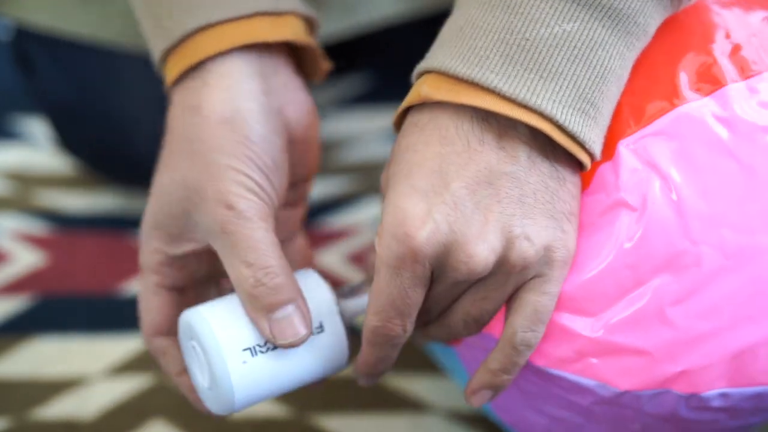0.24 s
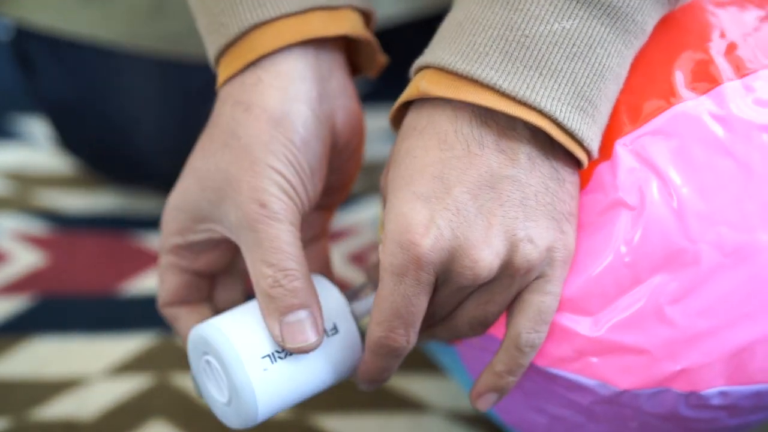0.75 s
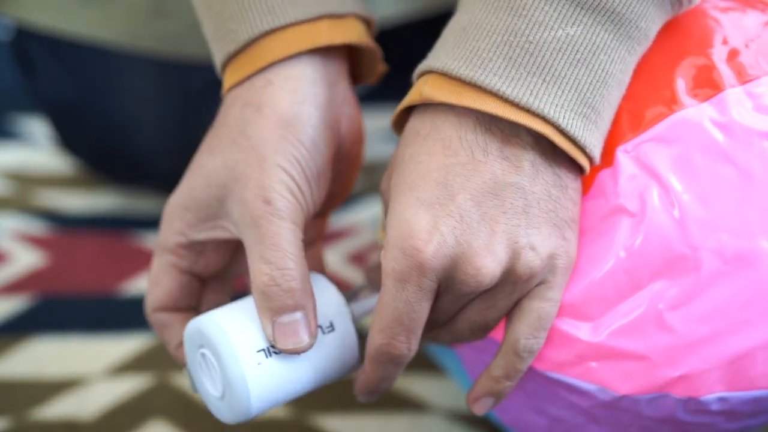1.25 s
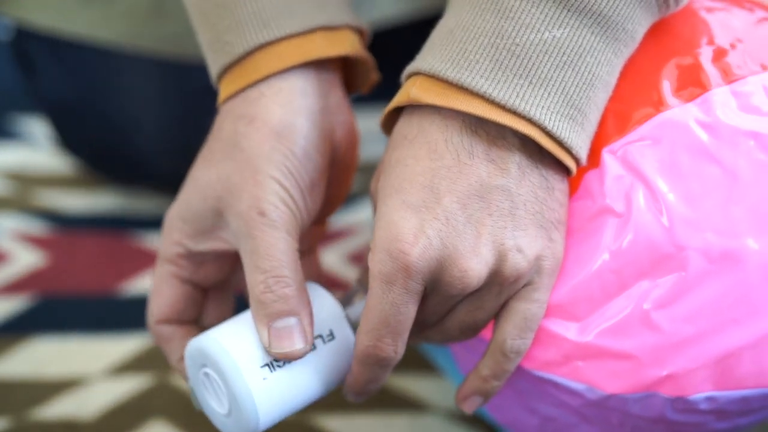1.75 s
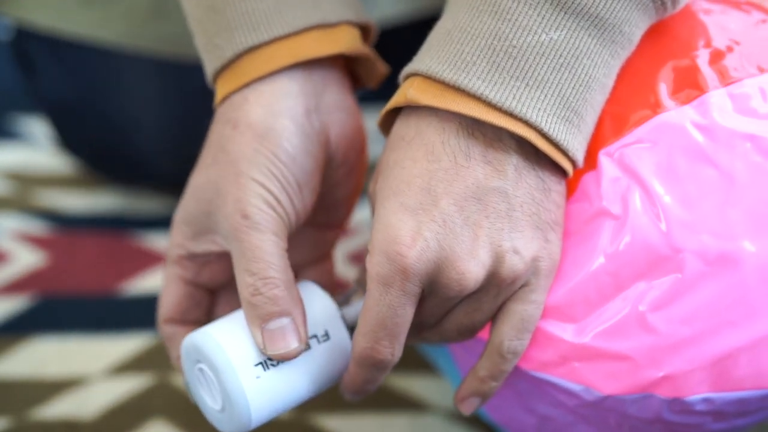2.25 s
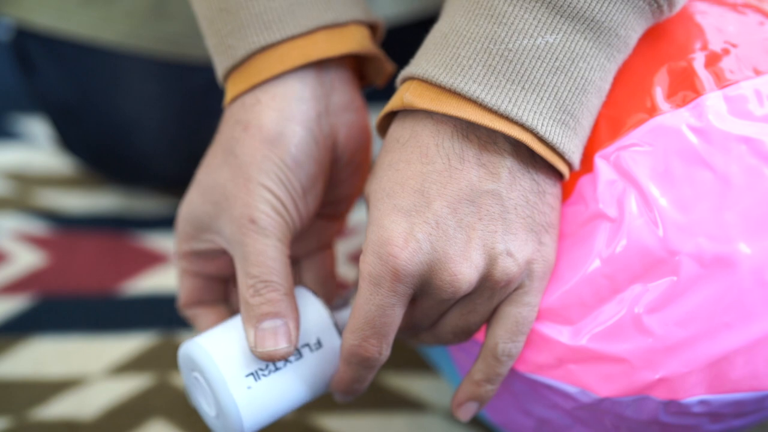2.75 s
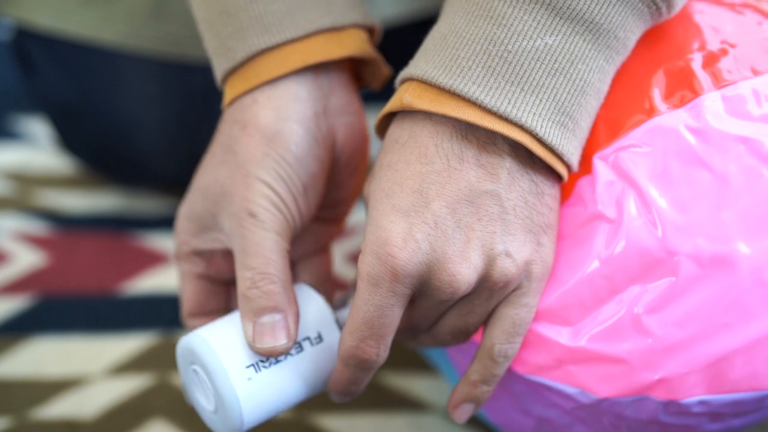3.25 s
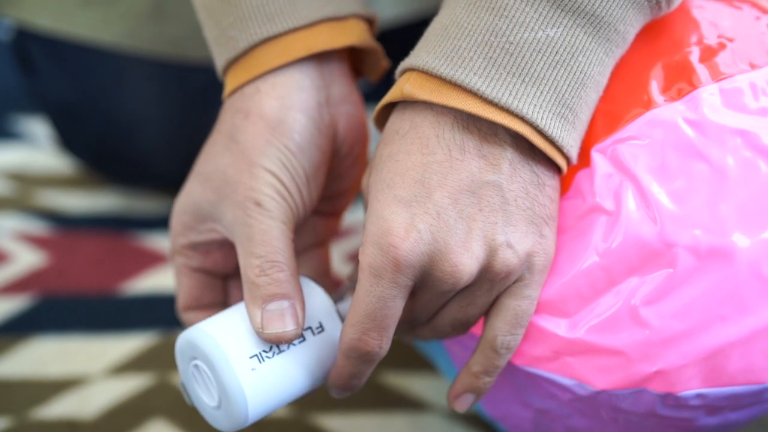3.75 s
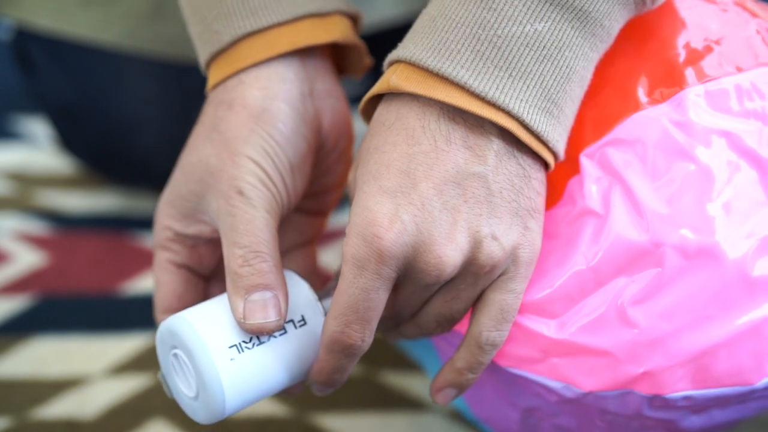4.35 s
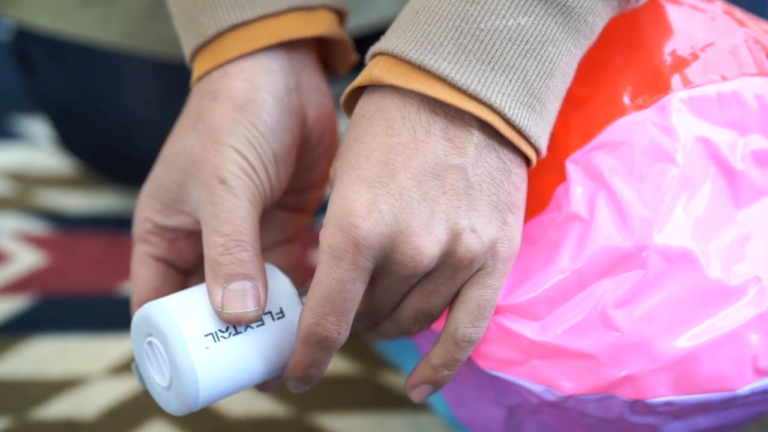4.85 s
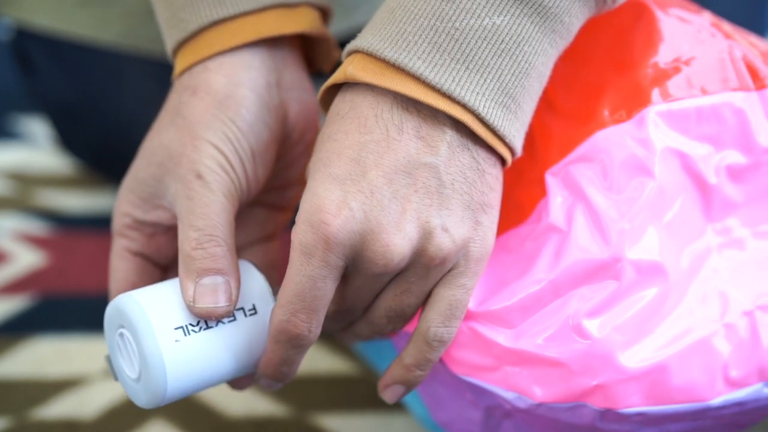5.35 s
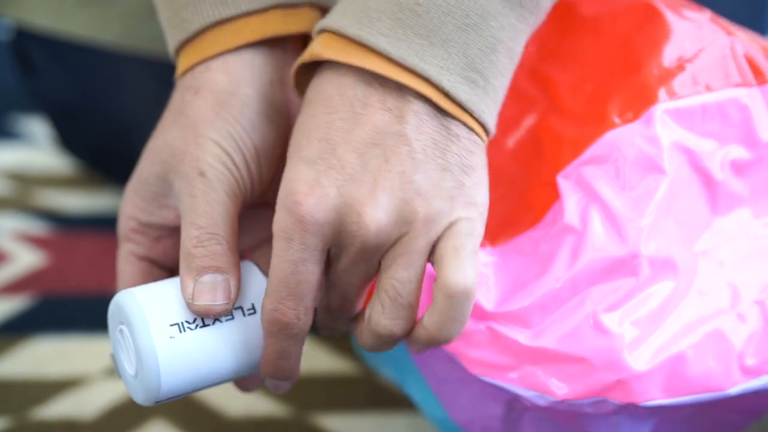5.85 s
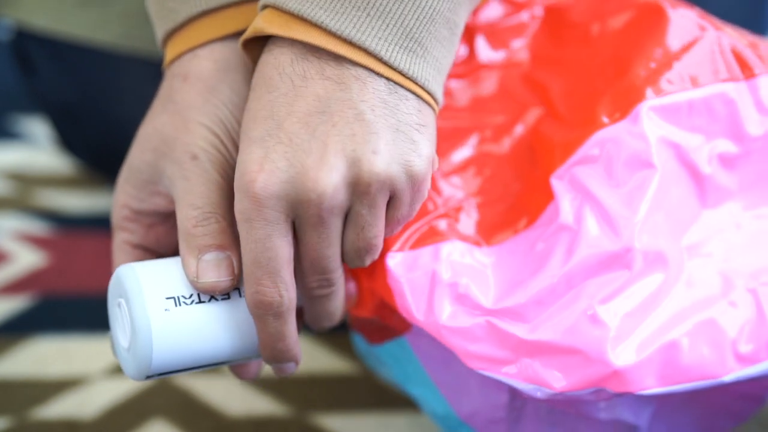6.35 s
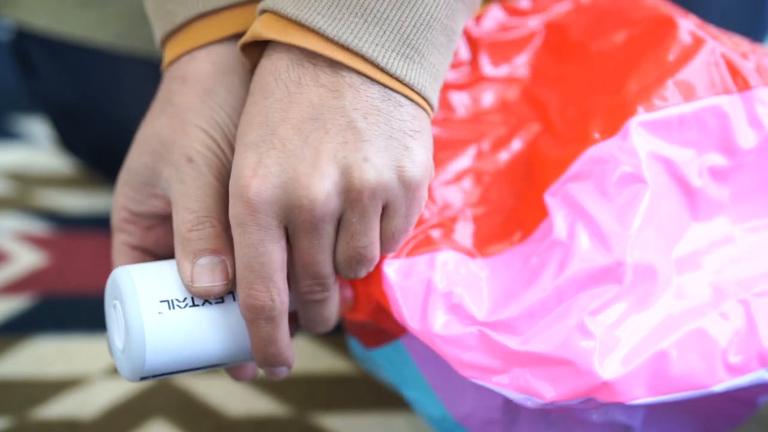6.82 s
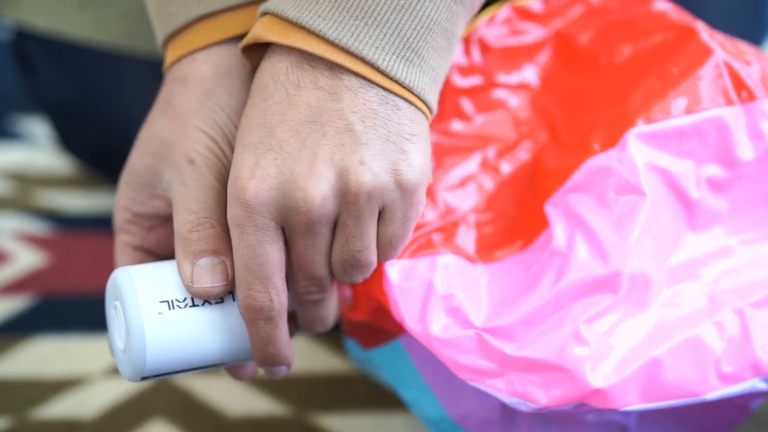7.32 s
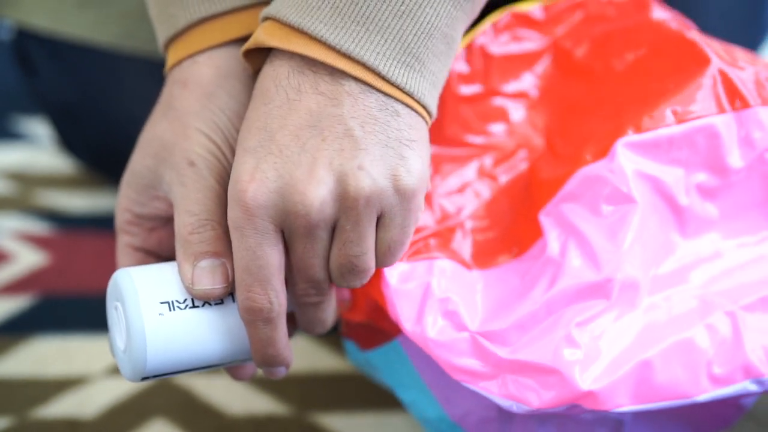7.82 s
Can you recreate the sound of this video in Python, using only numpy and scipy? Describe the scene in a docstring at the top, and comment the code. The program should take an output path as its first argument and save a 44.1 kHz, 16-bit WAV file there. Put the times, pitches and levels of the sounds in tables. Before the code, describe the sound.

In a small, quiet room, fingers fit a handheld battery air pump to a vinyl inflatable, making faint ticks, crinkles and soft bumps. A few plastic button clicks follow. Nearly halfway through, the motor spins up with a quickly rising whine, then runs steadily with a hiss of rushing air. The high tone swells and fades between left and right on the close stereo microphone as the hands shift.

```python
"""A small, quiet room, with a stereo microphone close to a hand-held battery air pump.
Fingers fit the pump to a vinyl inflatable, with ticks and low bumps, and press its button.
A nine-blade impeller spins up to a whine, and air rushes through the resonant housing and nozzle.
The hands shift, so each side of the microphone hears the tones swell and fade on its own."""
import sys
import numpy as np
from scipy import signal
from scipy.fft import rfft, irfft
from scipy.io import wavfile
from scipy.ndimage import uniform_filter1d, map_coordinates

SR = 44100
rng = np.random.default_rng(int(sys.argv[2]) if len(sys.argv) > 2 else 0)


def wav_out(sig):
    """Save sig, one row per channel (or a flat mono array), as 16-bit PCM at SR to the path in sys.argv[1]."""
    wavfile.write(sys.argv[1], SR, np.round(np.clip(np.atleast_2d(sig).T, -1, 1) * 32767).astype(np.int16))


N = 356328

# The empty room. Each row: frequency in Hz, relative noise density in dB.
ROOM_SPECTRUM = [(12, -5), (20, 5.5), (74, -4.5), (204, -8), (780, -17), (1400, -18.5), (14000, -35.5)]
# Its stereo image. Each row: frequency in Hz, left-right likeness from 0 to 1, left over right in dB.
ROOM_IMAGE = [(30, 0.016, 9.5), (135, 0.61, 0.5), (1800, 0.53, 2.5), (7000, 0.058, 1)]
# The background sinks once the pump is loud. Each row: time in seconds, level in dB.
ROOM_LEVEL = [(0, -37.5), (.6, -39), (3.7, -38.5), (4.1, -41.5), (5.1, -46.5)]
# Ticks of vinyl and nozzle. Each row: start in seconds, level in dB, band's nominal Hz, t60 in seconds.
VINYL_TICKS = [(0.146, -25, 1400, 0.02), (0.178, -22, 3770, 0.013), (.447, -18, 3230, 0.016),
               (0.586, -21, 2830, 0.015), (.753, -22.5, 5600, 0.077), (0.923, -20.5, 2540, 0.013),
               (1.728, -29.5, 5000, 0.055), (2.058, -20, 8000, 0.0027), (2.437, -23, 2980, 0.01),
               (2.522, -25, 1280, 0.019), (3.119, -25, 7500, 0.038), (3.324, -20.5, 6500, 0.035),
               (3.64, -27, 4000, 0.042)]
# Handling bumps. Each row: start in seconds, level in dB, pitch in Hz.
HAND_BUMPS = [(.146, -26, 350), (.215, -27, 484), (3.497, -23, 30), (3.547, -22, 192)]
# Taps on the plastic shell. Each row: start in seconds, strength in dB, treble gain in dB.
BUTTON_TAPS = [(3.155, -28.5, 8), (3.351, -19, -7), (3.4288, -27, 8), (3.6563, -18, -5.5)]
# The shell's modes. Each row: frequency in Hz, relative level in dB, t60 in seconds.
SHELL_MODES = [(1410, -3, 0.01), (3000, 2, .005), (4600, 1, .005), (6920, 3, 0.014), (7500, 2, 0.014)]
# The speed the loaded motor settles to. Each row: time in seconds, shaft rate in Hz.
SETTLED_SPEED = [(4.0, 636), (4.2, 626.5), (4.47, 632), (4.75, 632.6), (4.89, 638.6), (5.4, 629.8),
                 (6.15, 633.8), (6.45, 639), (6.85, 642.5), (7.1, 640.3), (7.22, 642.2), (7.45, 639),
                 (8.08, 640.5)]
# The hands change grip. Each row: time in seconds, share of the second grip from 0 to 1.
GRIP_SHIFT = [(4.9, 0.11), (6.2, 0.45), (7.3, 1.0)]
# The blade tone at the microphone as the hands move.
# Each row: time in seconds, left and right level in dB before colouring, left phase lead in radians.
BLADE_AT_MIC = [(3.8, -17.5, -16, -1), (3.95, -19, -14.5, -2), (4.38, -25.5, -14.5, -1.5),
                (4.46, -12, -13, -0.9), (4.68, -13, -21, -1.5), (4.76, -12, -22, -3.5),
                (4.81, -26, -12, -7.5), (4.9, -12.5, -16, -9), (5.01, -23, -13, -7.5),
                (5.07, -26, -10, -10.4), (5.22, -16.5, -11, -9.5), (5.36, -16, -12.5, -9.5),
                (5.6, -19.5, -11.5, -9.5), (6.05, -22, -13.5, -9), (6.19, -17, -14, -9),
                (6.35, -18, -14.5, -11.5), (6.6, -25, -16, -12), (6.85, -20.5, -19.5, -14),
                (6.93, -18, -20, -15.5), (7.25, -11.5, -14, -15.5), (7.45, -17.5, -26, -15),
                (7.8, -15.5, -28, -15), (8.08, -19.5, -28, -13)]
# Its octave. Each row: time in seconds, left and right level in dB before colouring.
OCTAVE_AT_MIC = [(4.3, -38, -35.5), (4.65, -42, -34.5), (5.7, -40, -35.5), (6.25, -43, -33.5),
                 (6.6, -37, -41), (6.95, -48, -32), (7.3, -45, -39.5), (8.08, -47, -42)]
# How the housing colours a tone. Each row: frequency in Hz, gain in dB.
HOUSING_COLOUR = [(300, -3.5), (480, 9.5), (630, 0), (1500, -16), (2160, 7.5), (2750, -11), (3950, -4),
                  (4300, 9.5), (5650, -0.5), (6600, 22), (8000, 15), (9000, -1), (10300, 8), (10950, 19),
                  (11350, 2.5)]
# The shaft tone against the rush, left then right. Each row: dB in the first grip, dB in the second.
SHAFT_AT_MIC = [(-3.5, -16), (-3.5, -8.5)]
# Weak shaft harmonics. Each row: multiple of the shaft rate, left and right dB in the first grip,
# left and right dB in the second, left phase lead in radians.
SHAFT_HARMONICS = [(3, -45, -45, -51, -43, .4), (5, -50, -42, -60, -46, -2.0), (6, -50, -45, -44, -38, -.9),
                   (7, -52, -39, -43, -43, -2.6), (8, -54, -42, -34, -34, 2.2)]
# The rush of air at full speed. Each row: time in seconds, base level in dB.
RUSH_LEVEL = [(3.78, -29), (3.92, -35), (4.1, -35), (4.25, -32.5), (4.95, -32.5), (5.12, -35.5),
              (6.0, -35.5), (6.6, -33), (8.08, -33.5)]
# The nozzle's narrow hiss, shaded while the hands move.
# Each row: time in seconds, level against the rush in dB, left phase lead in radians.
NOZZLE_HISS = [(4.5, 0, -0.84), (5.2, -6, -1.7), (6.6, -10, -.7), (7.1, 0.5, -.4)]
# Housing resonances; pairs are first grip, then second. Each row: two centres in Hz, width in Hz,
# two levels against the rush in dB, two left-over-right balances in dB, two left leads in radians.
HOUSING_MODES = [(469.5, 430, 250, -12.5, -15, -5.5, -2.5, -1.2, -1.5),
                 (1095, 1130, 290, -11, -16.5, -5.5, -13.5, -2, -0.5),
                 (1401, 1310, 144, -5.5, -9.5, -5.5, -5, -2.16, -0.8),
                 (1990, 2010, 137, -3.5, -2.5, -6.5, -7.5, -3.5, 0.5),
                 (2230, 2150, 187, 3, 2.5, -9, -3.5, 1.17, -0.5),
                 (3320, 3300, 410, -8.5, -17.5, -4, -4, -0.6, 3.5),
                 (3894, 3850, 600, -2.5, -0.5, -9, -6, -1.7, -.5),
                 (4633, 4800, 1140, 4, -0.5, -4, -3.5, -2, -3.5), (6080, 5800, 560, 3.5, 3, 0, 4.5, -3, -3),
                 (6770, 6850, 380, 0.5, 0.5, -5, 0, -4, -4),
                 (8250, 8500, 1530, 1, 0.5, -1.5, 0.5, -3, -2.5),
                 (9800, 9800, 740, -3, -5.5, 1, 0, -4.5, -4.5),
                 (12100, 12900, 2400, -19, -17.5, 0, -2, 1.1, 0.8)]

BLADES, NOMINAL_SHAFT_HZ = 9, 630
START_S, SPIN_UP_S = 3.633, .248
NOZZLE_HZ, NOZZLE_WIDTH_HZ, NOZZLE_PAN_DB = 4090, 123, -1.5
UNSHARED_BY_GRIP = (0.57, .3)   # share of the rush at 6 kHz that the two sides do not have in common


def from_db(db):
    """Decibels to gain."""
    return 10 ** (np.asarray(db) / 20)


def unit_power(x):
    """Scale to an RMS of 1."""
    return x / np.sqrt(np.mean(np.abs(x) ** 2) + 1e-20)


def in_time(rows):
    """Columns of a table as curves, sample by sample."""
    seconds, *columns = np.transpose(rows)
    return [np.interp(np.arange(N) / SR, seconds, column) for column in columns]


def at_hz(rows, hz, column=1):
    """Read a column of a spectrum on a log frequency axis."""
    rows = np.array(rows)
    return np.interp(np.log(hz), np.log(rows[:, 0]), rows[:, column])


def blend(first, second, share):
    """Slide from the first value to the second."""
    return first + (second - first) * share


def drift(rate_hz):
    """Smooth random wander with a spread of 1."""
    step = 40   # samples
    pole = np.exp(-2 * np.pi * rate_hz * step / SR)
    slow = signal.lfilter([1], [1, -2 * pole, pole * pole], rng.standard_normal(N // step + 2002))[2000:]
    return np.interp(np.arange(N) / step, np.arange(len(slow)), unit_power(slow))


def phase_of(hz):
    """Running phase of a changing frequency."""
    return 2 * np.pi * np.cumsum(hz) / SR


def stereo_tone(phase, left_db, right_db, lead):
    """A tone at the microphone, its left side ahead by lead radians."""
    left = from_db(left_db) * np.cos(phase + lead)
    right = from_db(right_db) * np.cos(phase)
    return np.sqrt(2) * np.array([left, right])


def ring(clicks, hz, t60):
    """Each click sets a dying sine ringing."""
    r, w = from_db(-60 / (t60 * SR)), 2 * np.pi * hz / SR
    return signal.lfilter([0, np.sin(w)], [1, -2 * r * np.cos(w), r * r], clicks + 1e-18)


def room_tone(hum_db):
    """Bass-heavy room noise; a narrow peak at 120 Hz is the rough mains hum."""
    hz = np.maximum(np.fft.rfftfreq(N, 1 / SR), 1)
    mid, side = rfft(rng.standard_normal((2, N))) * from_db(at_hz(ROOM_SPECTRUM, hz))
    mid *= 1 + from_db(hum_db) / (1 + ((hz - 120) / 6) ** 2)
    alike = np.clip(at_hz(ROOM_IMAGE, hz), 0, 1)
    spectrum = np.sqrt(1 + alike) * mid + np.sqrt(1 - alike) * side * [[1], [-1]]
    balance = from_db(at_hz(ROOM_IMAGE, hz, column=2) / 2 * [[1], [-1]])
    return unit_power(irfft(balance * spectrum, N))


def vinyl_crackle(per_second):
    """Tiny crackles come in clusters, a little to the left, each ringing at one of eight pitches."""
    sizes = from_db(3.5 * np.minimum(rng.exponential(1, N), 2.2))
    clicks = sizes * (rng.random(N) < per_second * from_db(6 * drift(2.5)) / SR)
    mode = rng.integers(0, 8, N)
    pitches = np.geomspace(1100, 6000, num=8)
    crackle = sum(ring(clicks * (mode == k), hz, t60=5 / hz) for k, hz in enumerate(pitches))
    return crackle * from_db([[1.5], [-1.5]])


def vinyl_ticks():
    """Vinyl and nozzle tick and creak under the fingers: short, dying bursts of noise."""
    out, t = np.zeros((2, N)), np.arange(SR // 8) / SR
    for start, level_db, hz, t60 in VINYL_TICKS:
        band = signal.butter(2, [hz / 6, hz * 1.8], "band", fs=SR, output="sos")
        burst = unit_power(signal.sosfilt(band, rng.standard_normal(len(t))))
        envelope = from_db(level_db - 60 * t / t60) * np.minimum(20 * t / t60, 1)
        out[:, round(start * SR):][:, :len(t)] += envelope * burst * [[.6], [.45]]
    return out


def hand_bumps():
    """Low handling bumps in the centre, each dying within a few cycles."""
    out, t = np.zeros((2, N)), np.arange(SR // 8) / SR
    for start, level_db, hz in HAND_BUMPS:
        bump = np.sin(2 * np.pi * hz * t) * np.exp(-hz * t)
        out[:, round(start * SR):][:, :len(t)] += from_db(level_db) * bump
    return out


def wall_echoes(sound, t60):
    """Near walls send different early echoes to each side of the microphone."""
    t = np.arange(round(t60 * SR)) / SR
    echoes = rng.standard_normal((2, len(t))) * from_db(-60 * t / t60) * (t > .002)
    echoes /= np.sqrt(np.sum(echoes ** 2) / 2)
    return signal.fftconvolve(sound, echoes, axes=1)[:, :N]


def button_taps():
    """Each tap is a few milliseconds of rattling contact that rings the plastic shell."""
    snaps, treble, t = np.zeros((2, N)), np.ones(N), np.arange(SR // 8) / SR
    for start, strength_db, treble_db in BUTTON_TAPS:
        onset = round(start * SR)
        treble[onset:] = from_db(treble_db)
        rattle = rng.choice([-1, 1], (2, len(t)))
        snaps[:, onset:onset + len(t)] += from_db(strength_db - 2200 * t) * rattle
    out = from_db(-7) * treble * snaps
    for hz, level_db, t60 in SHELL_MODES:
        out += from_db(level_db - 24) * ring(snaps * (treble if hz > 5000 else 1), hz, t60)
    return out


def motor_speed():
    """Shaft turns per second: the motor climbs quickly, then eases into its settled speed."""
    running_s = np.maximum(np.arange(N) / SR - START_S, .01)
    return in_time(SETTLED_SPEED)[0] * np.tanh(running_s / SPIN_UP_S)


def sweep_ripple(shaft_hz, depth_db, spacing_hz):
    """A gliding tone runs over the room's peaks and dips, so it flutters while the pitch climbs."""
    grid_hz = np.arange(0, 800, .05)
    ripple = map_coordinates(rng.standard_normal(2000), [grid_hz / spacing_hz], order=3)
    hz_per_second = np.gradient(shaft_hz) * SR
    climbing = uniform_filter1d(np.clip(hz_per_second / 90 - .3, 0, 1), size=1500)
    return depth_db * climbing * np.minimum(np.interp(shaft_hz, grid_hz, ripple), .5)   # capped peaks


def impeller_whine(shaft_hz, grip):
    """Passing blades and the turning shaft give tones locked to one speed, growing as it rises."""
    angle = phase_of(shaft_hz + 0.28 * drift(34))
    decades = np.log10(shaft_hz / NOMINAL_SHAFT_HZ)
    rise_db = 38 * decades

    def colour_db(multiple):
        return rise_db + at_hz(HOUSING_COLOUR, multiple * shaft_hz)

    def flutter_db():
        return sweep_ripple(shaft_hz, depth_db=6.5, spacing_hz=5) + .5 * drift(15)

    # The blade tone, its octave and its third harmonic.
    left_db, right_db, blade_lead = in_time(BLADE_AT_MIC)
    left_db += colour_db(BLADES) + flutter_db()
    right_db += colour_db(0.99 * BLADES) + flutter_db()
    out = stereo_tone(BLADES * angle, left_db, right_db, blade_lead)
    octave_db = [db + colour_db(2 * BLADES) + flutter_db() + 1.5 * drift(30)
                 for db in in_time(OCTAVE_AT_MIC)]
    out += stereo_tone(2 * BLADES * angle, *octave_db, lead=-2.05)
    third_db = [db + rise_db + flutter_db() for db in (-46, -42)]
    out += stereo_tone(3 * BLADES * angle, *third_db, lead=2 * blade_lead)

    # The shaft tone and its weak harmonics, which grow faster with speed.
    shaft_db = [blend(*side, grip) + in_time(RUSH_LEVEL)[0] + colour_db(1) for side in SHAFT_AT_MIC]
    out += stereo_tone(angle, *shaft_db, lead=-1.3 - 2.65 * grip)
    changeover = np.clip((grip - .43) / .3, 0, 1)   # midway through the shift of grip
    for multiple, left1, right1, left2, right2, lead in SHAFT_HARMONICS:
        left_db = blend(left1, left2, changeover) + 80 * decades + 1.5 * drift(3)
        right_db = blend(right1, right2, changeover) + 80 * decades + 1.5 * drift(3)
        out += stereo_tone(multiple * angle, left_db, right_db, lead)
    return out * (np.arange(N) / SR > START_S)


def resonant_hiss(hz, width_hz, level_db, pan_db, lead, unshared):
    """Noise rings in one resonance, partly different on each side of the microphone."""
    pole = signal.butter(1, .78 * width_hz, fs=SR, output="sos")
    white = rng.standard_normal((2, N)) + 1j * rng.standard_normal((2, N))
    narrow = unit_power(signal.sosfilt(np.vstack([pole, pole]), white))   # pointed top, steep flanks
    common, own = narrow * np.exp(1j * phase_of(hz))
    unshared = np.clip(unshared * hz / 6000, 0, 1)   # the sides are more alike in the bass
    left = np.sqrt(1 - unshared) * common * np.exp(1j * lead) + np.sqrt(unshared) * own
    return np.sqrt(2) * np.array([from_db(level_db + pan_db / 2) * left.real,
                                  from_db(level_db - pan_db / 2) * common.real])


def air_rush(shaft_hz, grip, waver_db):
    """Turbulence rings in each resonance of nozzle and housing; it grows with speed."""
    gust, unshared = drift(5.7), blend(*UNSHARED_BY_GRIP, grip)
    level_db, lead = in_time(NOZZLE_HISS)
    level_db += waver_db * (gust + drift(19))
    out = resonant_hiss(np.full(N, NOZZLE_HZ), NOZZLE_WIDTH_HZ, level_db, NOZZLE_PAN_DB, lead, unshared)
    for hz1, hz2, width_hz, db1, db2, pan1, pan2, lead1, lead2 in HOUSING_MODES:
        level_db = blend(db1, db2, grip) + waver_db * (gust + drift(17))
        pan_db, lead = blend(pan1, pan2, grip), blend(lead1, lead2, grip)
        out += resonant_hiss(blend(hz1, hz2, grip), width_hz, level_db, pan_db, lead, unshared)
    flow = from_db(in_time(RUSH_LEVEL)[0]) * (shaft_hz / NOMINAL_SHAFT_HZ) ** 1.93
    return out * flow * (np.arange(N) / SR > START_S)


def spin_up_hiss(level_db, above_hz, peak_after_s):
    """Bright hiss swells and dies during spin-up."""
    age = np.maximum(np.arange(N) / SR - START_S, 0) / peak_after_s
    swell = (age * np.exp(1 - age)) ** 2
    highpass = signal.butter(2, above_hz, "high", fs=SR, output="sos")
    noise = signal.sosfilt(highpass, rng.standard_normal((2, N)))
    return from_db(level_db + 2 * drift(30)) * swell * noise


def scene():
    """Pump and hands close to the microphone, with the room behind them."""
    shaft_hz, grip = motor_speed(), in_time(GRIP_SHIFT)[0]
    near = air_rush(shaft_hz, grip, waver_db=.9)
    near += spin_up_hiss(level_db=-40.5, above_hz=5000, peak_after_s=0.17)
    near += vinyl_ticks() + hand_bumps() + button_taps()
    echo = from_db(-12) * wall_echoes(near, t60=.09)
    whine = impeller_whine(shaft_hz, grip)
    background = room_tone(hum_db=5.5) + from_db(-.5) * vinyl_crackle(per_second=90)
    return whine + near + echo + from_db(in_time(ROOM_LEVEL)[0]) * background


def record(dry):
    """The treble is cut steeply above 15.9 kHz."""
    return signal.sosfilt(signal.ellip(10, .5, 70, 15900, fs=SR, output="sos"), dry)


dry = scene()
out = record(dry)
wav_out(out)
```